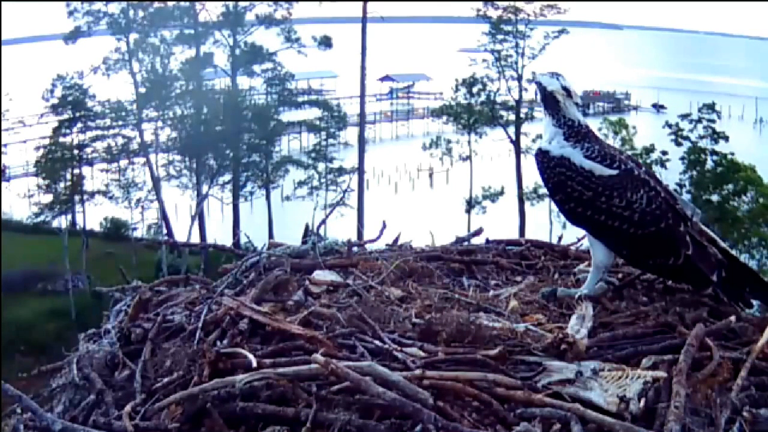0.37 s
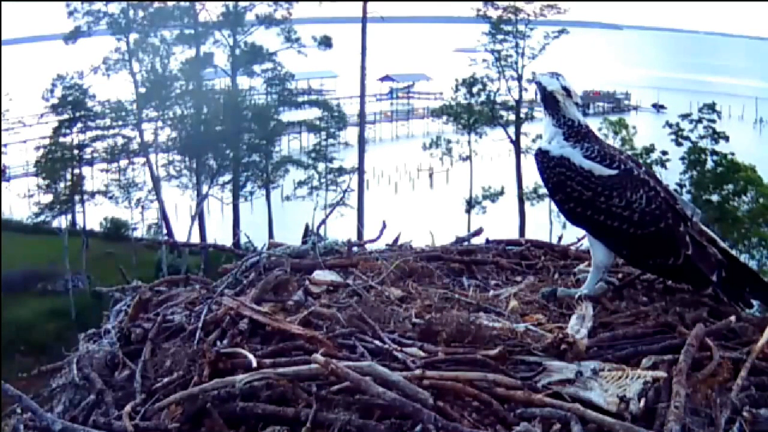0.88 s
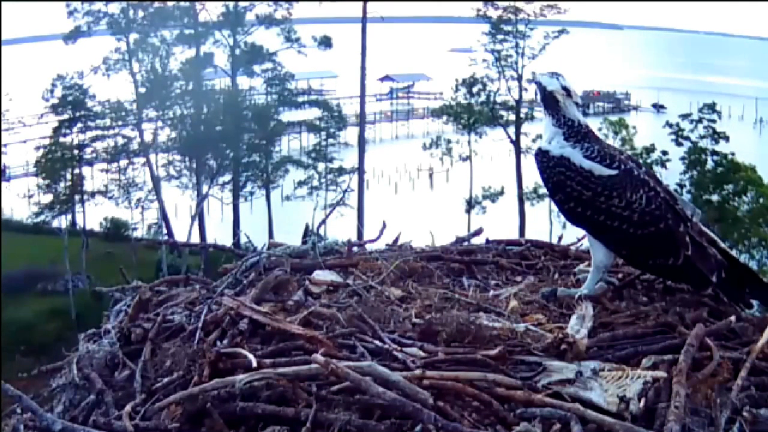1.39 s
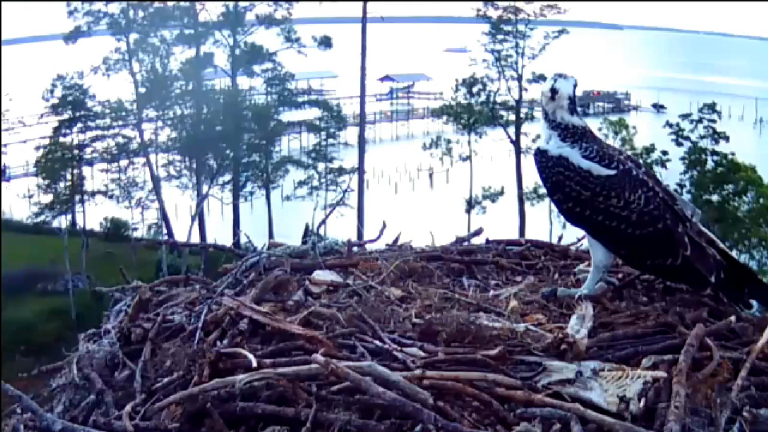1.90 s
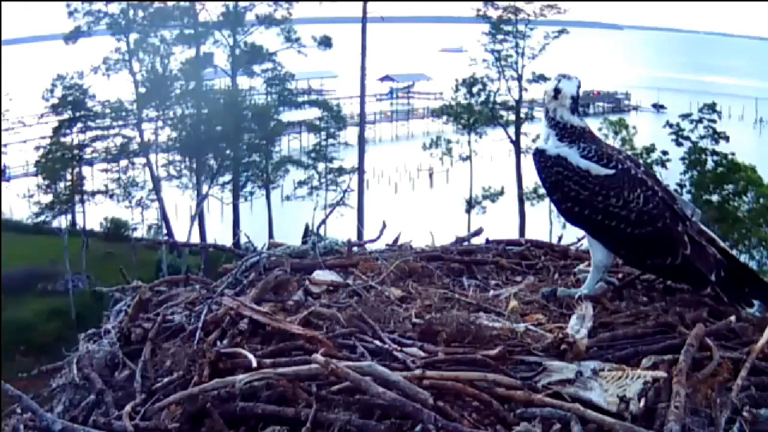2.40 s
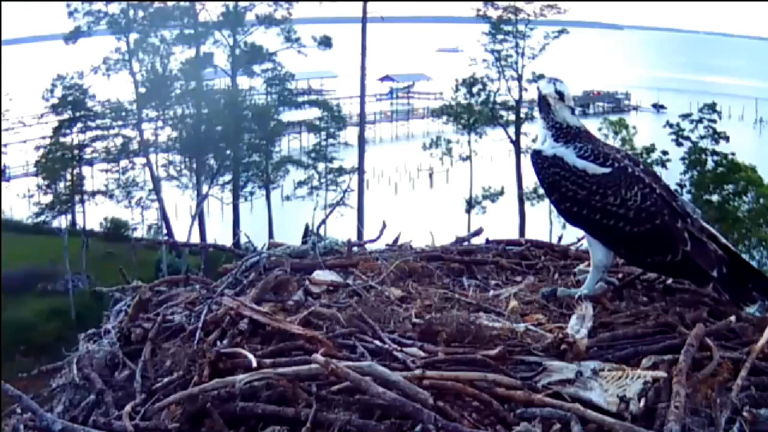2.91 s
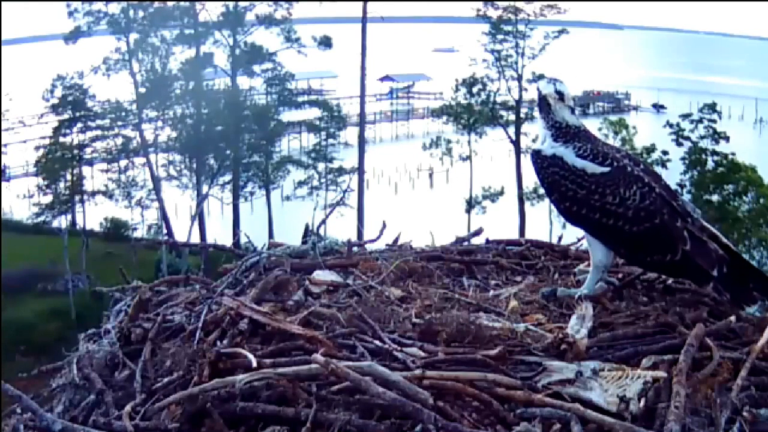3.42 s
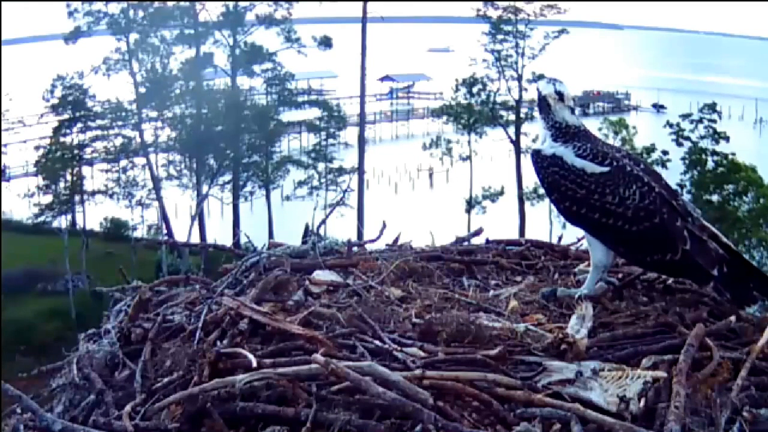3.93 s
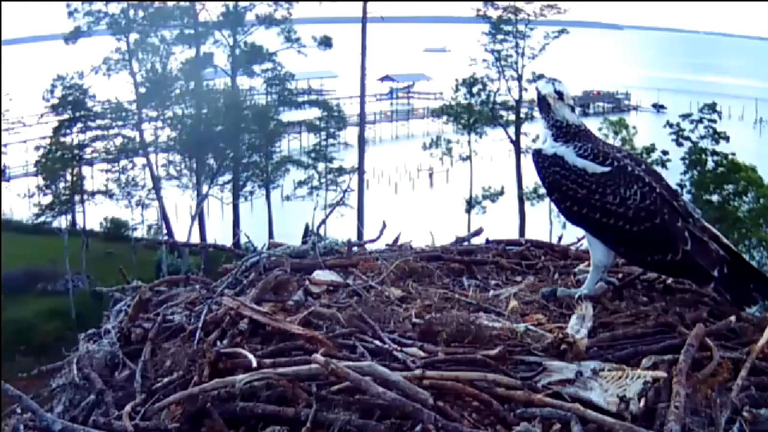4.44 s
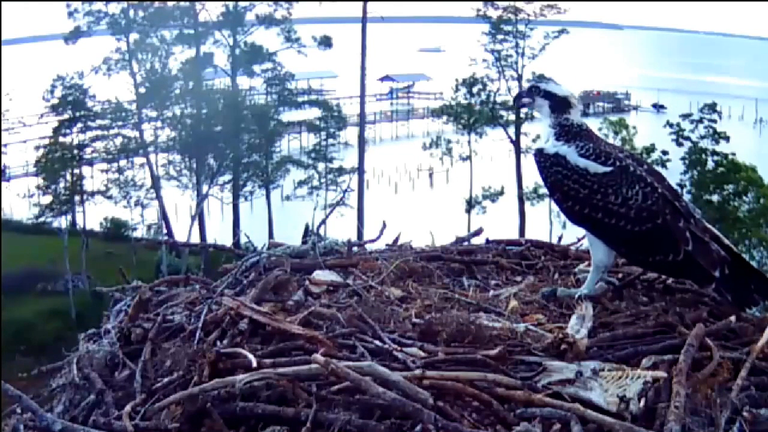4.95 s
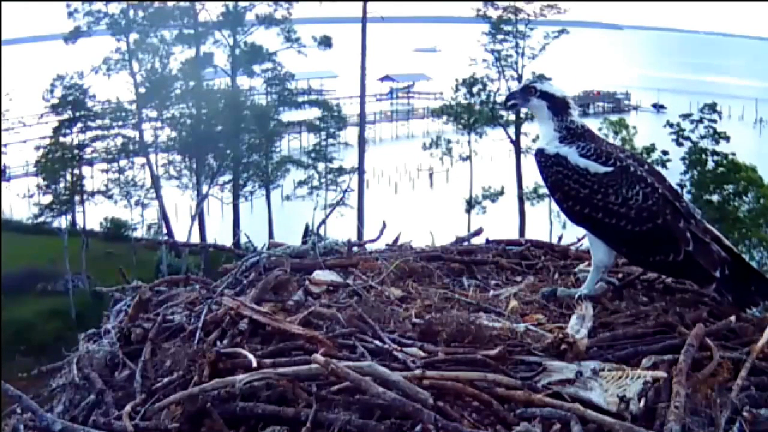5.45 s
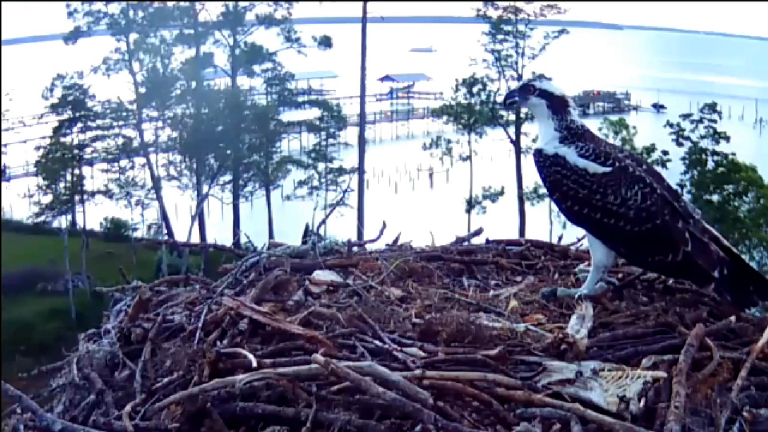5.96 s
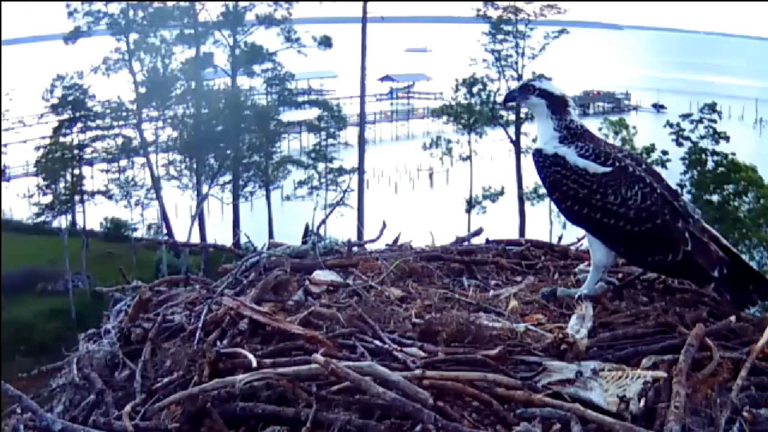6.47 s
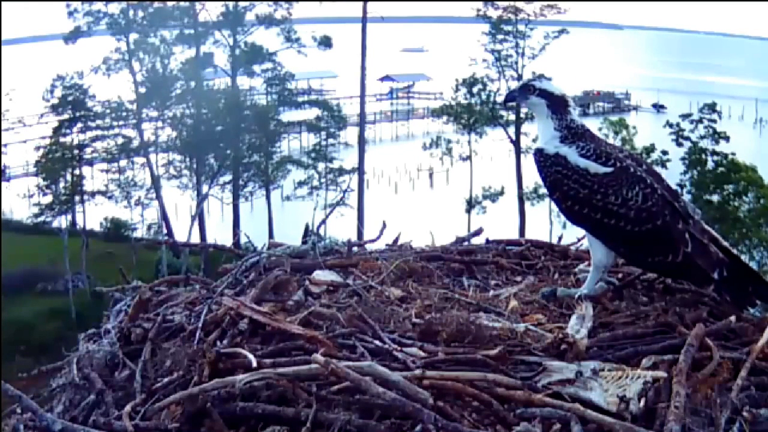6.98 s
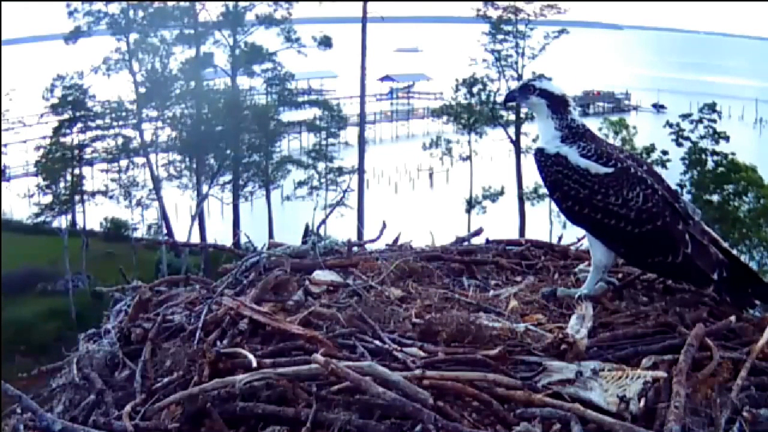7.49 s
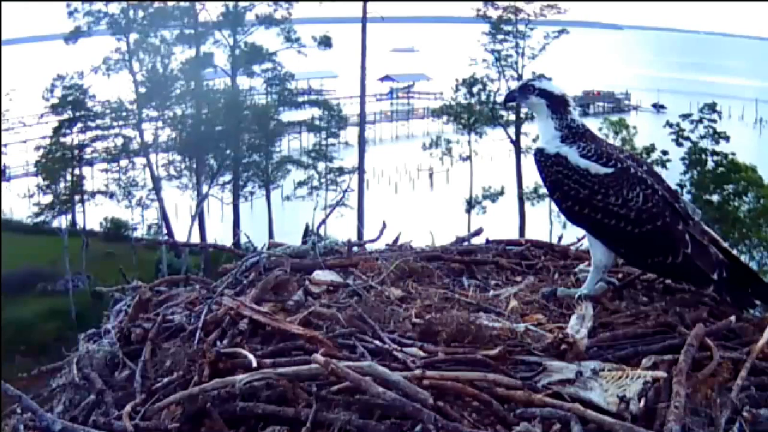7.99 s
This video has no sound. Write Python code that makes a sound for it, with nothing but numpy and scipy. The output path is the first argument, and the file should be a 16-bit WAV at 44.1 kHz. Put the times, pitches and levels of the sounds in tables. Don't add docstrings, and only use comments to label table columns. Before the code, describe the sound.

A young bird of prey fires off a rapid run of piercing upslurred whistles outdoors, over a faint low engine hum and airy hiss.

```python
import sys
import numpy as np
from scipy import signal
from scipy.fft import rfft, irfft, next_fast_len
from scipy.io import wavfile
from scipy.ndimage import uniform_filter1d, map_coordinates

SR = 44100
rng = np.random.default_rng(int(sys.argv[2]) if len(sys.argv) > 2 else 0)


def inscribe(sig):
    pcm = np.round(np.clip(np.atleast_2d(sig).T, -1, 1) * 32767)
    wavfile.write(sys.argv[1], SR, pcm.astype(np.int16))


def boost(x):
    u = np.asarray(x, float) / 20
    return 10 ** u


N = 361458
T = np.arange(N) / SR
CREST = 0.776

# freq_hz, density_db (per Hz)
HUM_COLOUR = [(30, -38), (118, -65), (140, -11.5), (180, -10.5), (240, -5), (290, -2.5), (350, -9.5),
              (420, -17.5), (530, -24), (800, -38), (1100, -58)]
# start_s, length_s, pitch_hz, level_db, end_change_db
BREAKS = [(1.307, 0.025, 2430, -22, -18), (1.494, 0.044, 2574, -12, -19), (1.646, 0.037, 2581, -11.5, -24),
          (1.796, 0.04, 2605, -12, -17), (1.95, 0.025, 2610, -15, -6), (2.71, 0.032, 2703, -13.5, -8),
          (2.869, 0.034, 2717, -12.5, -9.5), (3.021, 0.035, 2748, -13.5, -2.5),
          (3.181, 0.026, 2714, -15.5, 3), (3.325, 0.048, 2770, -15, -3.5), (3.483, 0.041, 2806, -15.5, 1),
          (3.641, 0.035, 2834, -17, 4), (3.794, 0.038, 2814, -15, 4.5), (3.964, 0.029, 2760, -14.5, 0.5),
          (4.12, 0.035, 2746, -13.5, -1)]
# time_s, opening_hz, climb_power (how it slows), second_partial_db
MOOD = [(1.474, 1743, 1.27, -2.5), (1.617, 1780, 1.23, -0.5), (1.764, 1803, 1.15, 1.5),
        (1.909, 1855, 1.2, 2), (2.055, 1853, 1.61, 0), (2.361, 1836, 1.79, -1.5), (2.513, 1863, 1.65, -1),
        (2.665, 1847, 1.4, -1.5), (2.822, 1886, 1.4, 0), (2.979, 1870, 1.15, -3), (3.135, 1858, 1.41, -5),
        (3.291, 1878, 1.33, -4), (3.445, 1895, 1.3, 1), (3.598, 1887, 1.6, 1.5), (3.755, 1906, 1.328, 3.5),
        (3.915, 1916, 1.6, -5.5), (4.081, 1867, 1.3, -2)]


def unit(x):
    return x / np.sqrt(np.mean(x ** 2) + 1e-20)


def along(points, hz):
    f, v = np.transpose(points)
    return np.interp(np.log(hz + 1), np.log(f + 1), v)


def track(table, column=1):
    columns = np.transpose(table)
    return np.interp(T, columns[0], columns[column])


def wobble(rate_hz):
    knots = rng.standard_normal(int(N * rate_hz / SR) + 4)
    return map_coordinates(knots, [T * rate_hz])


def filtered(x, points):
    m = next_fast_len(N + 8192)
    gain = boost(along(points, np.fft.rfftfreq(m, 1 / SR)))
    return irfft(rfft(x, m) * gain, m)[:N]


def noise(points):
    return unit(filtered(rng.standard_normal(N), points))


def spans(rows, size):
    inside = sum((T > a) & (T < b) for a, b in rows) * 1.
    return uniform_filter1d(inside, size=size)


def whistle(notes, overtone_db, flutter_db, edge_s):
    # freq_hz, gain_db
    edge_response = [(3400, -7.5), (3700, 5), (3900, -2.5), (4050, -28.5), (4300, -43.5), (5000, -48)]
    # freq_hz, gain_db
    edge_ringing = [(3850, -36), (3960, -10.5), (4080, -11.5), (4200, -20), (4350, -44), (4500, -59)]
    upper_attack_s = 0.0043
    ring_hz, ring_slide = 3930, .3
    mood = np.transpose(MOOD)
    out, flutter = np.zeros(N), wobble(170)
    for note in notes:
        s, hz, db = np.transpose(note)
        i = np.arange(round(s[0] * SR), min(round(s[-1] * SR), N))
        since = T[i] - s[0]
        pitch = uniform_filter1d(np.interp(T[i], s, hz), size=130)
        phase = 2 * np.pi * np.cumsum(pitch) / SR
        upper_db = overtone_db - 10 * np.clip(1 - since / upper_attack_s, 0, 1)
        upper_db = upper_db + np.interp(s[0], mood[0], mood[3])
        second = boost(upper_db + along(edge_response, 2 * pitch)) * np.sin(2 * phase)
        ring_phase = 2 * np.pi * (1 + ring_slide) * ring_hz * T[i] - 2 * ring_slide * phase
        ring = boost(upper_db + along(edge_ringing, 2 * pitch)) * np.sin(ring_phase)
        fade = np.clip(np.minimum(since, s[-1] - T[i]) / edge_s, 0, 1)
        level = boost(np.interp(T[i], s, db) + flutter_db * flutter[i])
        out[i] += np.sqrt(2) * level * fade * (np.sin(phase) + second + ring)
    return out


def engine_hum():
    # time_s, level_db
    hum_level = [(0, -47), (.1, -45), (.38, -48), (.66, -47), (.72, -47.5), (.9, -47), (1.4, -47),
                 (2.3, -45), (3, -47), (3.65, -47), (3.86, -44.5), (4.3, -47.5), (4.9, -47), (5.85, -47.5),
                 (6.08, -45), (6.3, -47.5), (7.55, -49.5), (8.2, -46.5)]
    # time_s, firing_hz, second_order_db
    engine_run = [(0, 156, -45), (.1, 152.2, -35.5), (.4, 151.7, -56), (.75, 151.1, -46),
                  (1.1, 151.5, -50.5), (1.6, 150.9, -49.5), (2.25, 150, -43.5), (2.62, 149.9, -51.5),
                  (2.88, 150, -41), (3.15, 149.1, -55), (3.4, 149.5, -47), (3.6, 148.8, -55),
                  (3.9, 147.7, -44.5), (4.6, 143.8, -45.5), (5.8, 143.4, -51), (6.1, 143.9, -42.5),
                  (6.9, 143.8, -60.5), (7.5, 143.9, -55), (8.2, 142.5, -44)]
    phase = 2 * np.pi * np.cumsum(track(engine_run) + 1.378 * wobble(7)) / SR
    tones = boost(-10.5 + 1.8 * wobble(6)) * np.sin(phase)
    tones = tones + boost(-11.5 + 4.8 * wobble(4.004)) * np.sin(1.6 * phase + 1.63 * wobble(14))
    rumble = boost(-1.5 + 0.33 * wobble(7.6)) * noise(HUM_COLOUR)
    gust_db = 1.7 * wobble(6.4)
    hum = boost(track(hum_level) + gust_db) * (rumble + tones)
    second_order = boost(track(engine_run, 2) - 3.0 + 1.53 * wobble(9)) * np.sin(2 * phase)
    return hum + np.sqrt(2) * second_order


def leaves_and_water():
    # freq_hz, density_db (per Hz)
    air_colour = [(500, -29.5), (800, -24), (1040, -7), (1520, -10.5), (2100, -3.5), (3200, -6),
                  (3900, -3.5), (4100, -28.5), (5600, -44)]
    return boost(-54.0 + 0.98 * wobble(2.77) + 0.23 * wobble(19.0)) * noise(air_colour)


def insects():
    # time_s, level_db
    chorus_level = [
        (0, -84),
        (1.2, -58.5),
        (4.3, -55),
        (6, -56.5),
        (8.2, -55),
    ]
    band = noise([(3200, -27.0), (3450, 3.0), (3750, 3.5), (3950, -5.5), (4100, -26),
                  (10800, -28), (11100, -61)])
    return boost(track(chorus_level) + 1.1 * wobble(5.5)) * band


def far(rows, bend):
    u = np.linspace(0, 1, num=12)
    notes = []
    for s, length, hz, db, crest in rows:
        pitch = hz - bend * ((u - crest) * length) ** 2
        level = db - 3.5 * (2 * u - 1) ** 2
        notes.append(np.transpose([s + u * length, pitch, level]))
    return notes


def far_birds():
    # start_s, length_s, crest_hz, level_db, crest_share (of
    steep_calls = [(.215, .085, 2610, -57, .55), (.655, .075, 2630, -56, .5), (.85, 0.09, 2700, -55.5, .55),
                   (1.062, 0.06, 2770, -54.5, 0.7), (4.248, 0.008, 1840, -30, .5),
                   (2.44, .07, 2820, -51, .65), (4.62, .03, 2060, -55, 1.5),
                   (4.772, 0.075, 2930, -45.5, 0.5), (4.975, .088, 3010, -45, .55),
                   (5.03, .04, 2220, -56, -.2), (5.165, .05, 2190, -52, .95), (5.2, 0.066, 3010, -44, 0.55),
                   (5.215, .075, 2270, -55, .4), (5.395, 0.075, 2180, -49, 0.8),
                   (5.452, .045, 3020, -43, -.3), (5.47, .055, 2200, -54, -.3)]
    # start_s, length_s, crest_hz, level_db, crest_share
    flat_calls = [(.022, 0.058, 3110, -56, .5), (.05, .05, 2600, -60, -.5), (.47, 0.06, 2720, -55, 0.8),
                  (.72, 0.085, 2490, -55, 0.4), (1.345, .048, 2720, -52, 0.72),
                  (1.868, 0.028, 2770, -47, .5), (2.27, 0.038, 2750, -48, .2), (3.28, .045, 2750, -44, .9),
                  (3.075, 0.073, 2780, -52, .7), (3.72, .045, 2810, -51, .6),
                  (7.33, 0.065, 1900, -56.5, .6), (7.555, 0.035, 2060, -55, .2),
                  (7.76, 0.075, 2150, -57.5, .8), (7.82, .06, 2240, -61, .4), (8.01, 0.035, 2080, -55, 0.4)]
    return whistle(far(steep_calls, 125000) + far(flat_calls, 28600), -60, 3.6, .012)


def breaks():
    sag_shapes = [(0.13, 0.09), (0.23, 0.084), (0.14, 0.12), (0.055, 0.11), (.15, 0.16), (0.16, 0.087),
                  (.05, 0.11), (.05, 0.11), (0.075, 0.091), (.33, 0.12), (0.12, 0.1), (0.058, 0.12),
                  (0.043, 0.09), (.03, 0.1), (0.12, 0.09)]
    sag_bend, release_s, release_db = 2.22, 0.0069, -28
    u = np.linspace(0, 1, num=24)
    notes = []
    for (s, length, hz, db, tire_db), (crest, sag) in zip(BREAKS, sag_shapes):
        pitch = hz * (1 - sag * np.abs((u - crest) / (1 - crest)) ** sag_bend)
        release = release_db * np.clip(1 - (1 - u) * length / release_s, 0, 1)
        notes.append(np.transpose([s + u * length, pitch, db + tire_db * u ** 2 + release]))
    return notes


def climbs(rows, lengths, crest):
    attack_s, attack_db = .008, -15
    half_swell = 0.083
    turn_hz, turn_db = 120, -6
    mood = np.transpose(MOOD)
    u = np.linspace(0, 1, num=24)
    notes = []
    for (s, top_hz, early_db, top_db, swell), length in zip(rows, lengths):
        past = np.clip(u - crest, 0, 1) / (1 - CREST)
        from_hz = np.interp(s, mood[0], mood[1])
        bend = np.interp(s, mood[0], mood[2])
        risen = 1 - np.clip(1 - u / crest, 0, 1) ** bend
        pitch = from_hz + (top_hz - from_hz) * risen - turn_hz * past ** 2
        level = np.interp(u, [swell - half_swell, swell + half_swell], [early_db, top_db])
        level = level + turn_db * past + attack_db * np.clip(1 - u * length / attack_s, 0, 1)
        notes.append(np.transpose([s + u * length, pitch, level]))
    return notes


def catches():
    # time_s, width_s, depth_db
    beat_notches = [(1.4828, 0.0019, -8), (1.9349, 0.0033, -5), (1.9425, 0.0011, -8), (1.9476, 0.0025, -7),
                    (1.782, .012, 4), (2.1206, 0.0015, -7), (2.217, .004, 3), (2.1274, 0.00089, 0),
                    (2.2275, 0.0027, -1.5), (2.234, 0.0017, -15), (2.2412, 0.0016, -10),
                    (2.2675, 0.0034, -7), (2.2745, 0.0016, -5), (2.28, 0.0028, -1), (2.3695, 0.0025, -6.1),
                    (2.42, .004, -2.5), (2.4265, 0.0025, -6), (2.4322, 0.0019, -5), (2.5281, 0.0023, -6),
                    (2.5347, 0.003, -14), (2.547, 0.0073, -5.5), (2.572, 0.003, -2), (2.578, 0.004, 4),
                    (2.5859, 0.003, 2), (2.6718, 0.0023, -9), (2.6952, 0.006, -6.5), (2.8283, 0.0014, 0),
                    (2.8328, 0.0017, -14), (2.8426, 0.0029, -21), (2.986, .004, 3), (2.9946, 0.007, -6),
                    (3.0125, 0.0026, -5), (3.297, .003, 3), (3.3003, 0.0016, -5), (3.3039, 0.0022, -11),
                    (3.4435, .003, -9), (3.4553, 0.0026, -7), (3.462, 0.0029, -6), (3.6035, 0.0013, -2),
                    (3.6096, 0.0018, -11), (3.606, .003, 4), (3.614, 0.0028, -8), (3.7657, 0.0029, -8),
                    (3.7711, 0.0022, -8), (3.7821, 0.004, -5), (3.79, .005, 4), (3.905, .004, -8),
                    (3.9267, 0.0029, -9), (3.936, 0.0036, -11), (4.078, .003, -10), (4.094, 0.0021, -9),
                    (4.1055, 0.0037, -7)]
    return boost(sum(0.84 * db * np.exp(-(1.44 * (T - s) / width) ** 2) for s, width, db in beat_notches))


def fading(rows):
    return [[(s, hz, db), (s + length, hz - 60.4, db - 13.5)] for s, length, hz, db in rows]


def sibling():
    # start_s, length_s, end_hz, level_db
    lead_notes = [(1.884, 0.05, 2240, -32), (2.184, 0.095, 2170, -27.5), (2.319, 0.052, 2300, -32.5),
                  (2.485, 0.045, 2160, -34.5), (2.646, 0.052, 2160, -22), (2.784, 0.066, 2310, -31.5),
                  (2.947, 0.059, 2020, -33), (3.084, 0.053, 2060, -44), (3.258, 0.068, 2255, -30.5),
                  (3.418, 0.076, 2234, -25), (3.547, 0.12, 2210, -36), (3.715, 0.055, 2230, -37),
                  (3.884, 0.033, 2140, -33), (4.057, 0.036, 1990, -31)]
    # start_s, length_s, pitch_hz, level_db
    tail_notes = [(1.96, 0.052, 2190, -41), (2.117, 0.042, 2186, -25), (2.271, 0.052, 2160, -30),
                  (2.418, 0.066, 2102, -34), (2.595, 0.08, 2090, -37.5), (2.73, 0.032, 2203, -61),
                  (3.196, 0.062, 1900, -47), (3.386, 0.046, 1996, -44), (3.674, 0.043, 2030, -37),
                  (3.828, 0.057, 2170, -44), (3.058, 0.026, 2050, -41), (3.53, 0.04, 2100, -43.5),
                  (4.19, 0.07, 2000, -51), (3.997, 0.039, 2050, -42), (4.148, 0.034, 2050, -28)]
    lead_hz = 2050
    leads = []
    for s, length, hz, db in lead_notes:
        leads.append([(s, lead_hz, db - 14), (s + length / 2, lead_hz, db - 2), (s + length, hz, db + 5)])
    return whistle(leads + fading(tail_notes), -60, 2.6, .007)


def chips():
    # start_s, length_s, first_hz, last_hz, level_db
    slides = [(1.929, .028, 2350, 2660, -24), (2.044, .01, 2300, 1800, -41), (2.225, .02, 2250, 2260, -31),
              (2.952, .014, 2050, 2050, -37), (2.505, .01, 1800, 1810, -39), (2.59, .018, 2050, 2250, -27),
              (2.654, .013, 2150, 2000, -31), (2.735, .04, 2200, 2180, -48), (2.35, .014, 2200, 2050, -28),
              (2.812, .012, 2100, 1900, -33), (4.572, .008, 2700, 2300, -50),
              (4.652, .008, 2700, 2200, -52), (3.122, .012, 2250, 1950, -32),
              (3.203, .016, 1880, 1860, -33), (3.592, .008, 2100, 1950, -31),
              (3.746, .008, 2100, 1900, -33), (3.906, .008, 2100, 2000, -33)]
    notes = [[(s, a, db - 4), (s + length, b, db)] for s, length, a, b, db in slides]
    return whistle(notes, -60, 3, .003)


def flicks(notes, length, from_hz, to_hz, db):
    falls = []
    for note in notes:
        s = note[-1, 0] - .006
        middle = (s + length / 2, (2 * from_hz + to_hz) / 3, db)
        falls.append([(s, from_hz, db), middle, (s + length, to_hz, db - 6)])
    return falls


def echoed(voice):
    # delay_s, level_db
    reflections = [
        (.009, -23),
        (.03, -41),
    ]
    t = T[:SR // 2]
    scatter = rng.standard_normal(len(t)) * boost(-60 * t / .5)
    answer = boost(-31) * scatter / np.linalg.norm(scatter)
    for s, echo_db in reflections:
        answer[round(s * SR)] += boost(echo_db)
    return voice + signal.fftconvolve(voice, answer)[:N]


def chick():
    # start_s, top_hz, early_db, top_db, swell_share (of length)
    climbing = [(1.474, 2057, -20.5, -19, 0.97), (1.617, 2184, -22, -17.5, 0.53),
                (1.764, 2212, -22.5, -14, 0.7), (1.909, 2235, -19.5, -21.5, 0.21),
                (2.668, 2285, -21.5, -14, 0.61), (2.822, 2287, -22.5, -14.5, 0.52),
                (2.979, 2295, -21.5, -10.5, 0.75), (3.135, 2290, -22.5, -16.5, 0.45),
                (3.291, 2265, -20.5, -13.5, 0.62), (3.445, 2330, -21.5, -13.5, 0.57),
                (3.6, 2322, -21, -14.5, 0.52), (3.755, 2340, -22.5, -14, 0.59),
                (3.915, 2310, -20.5, -14.5, 0.53), (4.081, 2317, -20.5, -14.5, 0.51)]
    # start_s, top_hz, early_db, top_db, swell_share
    arching = [
        (2.055, 2215, -20.5, -15.5, 0.38),
        (2.209, 2240, -22, -16.5, 0.71),
        (2.361, 2218, -21, -14, 0.44),
        (2.515, 2216, -21.5, -16, 0.4),
    ]
    # start_s, length_s, pitch_hz, level_db
    lingering = [
        (1.95, 0.026, 2190, -32),
        (2.712, 0.034, 2290, -26),
        (3.183, 0.018, 2220, -20),
        (3.329, 0.014, 2340, -16.5),
        (3.485, 0.019, 2320, -26),
        (4.122, 0.027, 2330, -29),
    ]
    # length_s, start_hz, end_hz, level_db
    drops = [
        (0.0191, 2170, 1780, -25),
        (0.0115, 2030, 1760, -34),
    ]
    arch_s, overlap_s = .063, 0.0051
    high = breaks()
    arches = climbs(arching, [arch_s] * len(arching), CREST)
    lengths = [after[0] + overlap_s - row[0] for row, after in zip(climbing, BREAKS[1:])]
    low = climbs(climbing, lengths, 0.94)
    singing = spans([(n[0, 0] + .004, n[-1, 0]) for n in low + arches], size=200)
    voice = whistle(low + arches + fading(lingering), 0, .45, .003)
    voice = voice + boost(-1.5 * singing) * sibling()
    voice = catches() * (voice + whistle(flicks(arches, *drops[0]), 0, 1, .003))
    voice = voice + whistle(high, -9, .5, .003) + chips()
    voice = voice + whistle(flicks(high[6:], *drops[1]), -3, 1.5, .003)
    delay_s, width_s, dip_db = .003, .0016, -6
    dips = sum(dip_db * np.exp(-((T - row[0] - delay_s) / width_s) ** 2) for row in BREAKS[1:])
    return echoed(voice * boost(dips))


def scene():
    return (engine_hum() + leaves_and_water() + insects() + far_birds() + chick())[None]


def circuit_hiss(busy, idle):
    # freq_hz, density_db (per Hz)
    hiss_colour = [(290, -66), (500, -23.5), (1050, -20), (2480, -9), (3430, -8), (4510, -6), (5340, -6.5),
                   (7880, -6.5), (9830, -13.5), (10800, -10), (11150, -36), (11350, -75), (22000, -120)]
    # from_s, to_s
    lost_treble = [
        (1.33, 1.348),
        (1.44, 1.475),
        (1.608, 1.619),
        (1.735, 1.765),
        (2.035, 2.056),
    ]
    hz, t, z = signal.stft(boost(-52.0) * noise(hiss_colour), SR, nperseg=2048)
    chance = np.repeat(rng.random((len(hz), len(t) // 2 + 1)), 2, axis=1)[:, :len(t)]
    edge_hz = 7900 + 380 * np.interp(t, T, wobble(6.0)) + 1500 * np.interp(t, T, idle)
    share = np.interp(hz[:, None] - edge_hz, [-1200, 0, 100, 1000, 2400], [1, .5, .055, .035, .002])
    line = boost(14.5) * z / np.abs(z + 1e-12) * np.mean(np.abs(z), axis=1, keepdims=True)
    kept = np.where(share < .07, line, z)
    thinned = np.where(chance < share, kept, boost(-13) * z)
    mixed = np.where(np.interp(t, T, busy) > .5, z, thinned)
    hiss = signal.istft(mixed, SR, nperseg=2048)[1][:N]
    return hiss - .7 * spans(lost_treble, size=90) * filtered(hiss, [(4000, -60), (5000, 0)])


def limited(x):
    envelope = np.abs(signal.hilbert(x, next_fast_len(N))[:N])
    return x / (1 + (envelope / .31) ** 7) ** (1 / 7)


def clock_flutter(x):
    # freq_hz, level_db
    mirrors = [(3900, -20.5), (7800, -27), (11700, -28.5), (10350, -30), (6450, -32), (2550, -35),
               (1350, -37.5), (5250, -38)]
    return x * (1 + sum(boost(db) * np.cos(2 * np.pi * hz * T) for hz, db in mirrors))


def band_limit(x):
    return signal.sosfilt(signal.butter(12, 11540, fs=SR, output="sos"), x)


def record(dry):
    # from_s, to_s
    gate_shut = [
        (.419, .474),
        (1.122, 1.3098),
        (1.394, 1.456),
        (4.256, 4.571),
        (4.661, 4.777),
        (6.228, 6.539),
        (6.627, 6.688),
        (6.77, 6.828),
    ]
    # centre_s, length_s, level_db
    noise_bursts = [(1.523, 0.036, -30.5), (1.662, 0.036, -36), (1.825, 0.034, -36), (1.957, 0.033, -28),
                    (2.124, 0.02, -38.5), (2.258, 0.041, -38), (2.429, 0.014, -35), (2.55, 0.036, -44),
                    (2.6, 0.015, -36), (2.725, 0.027, -28.5), (2.891, 0.031, -31.5), (3.02, 0.018, -38),
                    (3.072, 0.013, -36.5), (3.192, 0.031, -27), (3.359, 0.033, -30), (3.494, .03, -41),
                    (3.539, 0.015, -38), (3.61, 0.04, -41), (3.663, 0.032, -32.5), (3.798, .01, -38),
                    (3.834, 0.024, -34), (3.972, .015, -39), (4.008, 0.016, -35), (4.107, .03, -44),
                    (4.141, 0.027, -32.5), (4.185, 0.0071, -41)]
    # freq_hz, density_db
    grit_colour = [(60, -3.5), (500, -14), (1500, -6.5), (2700, 4), (3500, 6), (4800, -2.5), (8000, -1.5),
                   (10500, 0.5), (11300, -28.5)]
    shut = spans(gate_shut, size=60)
    gated = dry[0] * boost(-30 * shut) + boost(-68) * shut * noise(HUM_COLOUR)
    x = limited(filtered(gated, [(70, -25), (115, -8), (140, 0)]))
    level = np.sqrt(np.abs(uniform_filter1d(x ** 2, size=500)))
    spray = sum(boost(db) * np.exp(-(2 * (T - s) / length) ** 4) for s, length, db in noise_bursts)
    fray = noise([(50, 0), (400, -3), (800, -14), (1300, -22), (2000, -34)])
    x = x * (1 + (boost(-26) * (level > .016) + boost(11) * spray) * fray)
    x = clock_flutter(x)
    thump = filtered(x ** 2, [(15, -31.0), (30, -10.5), (100, 5.5), (300, -7), (600, -89.0)])
    grit = boost(1.8 * wobble(140)) * (boost(-30.5) * level + boost(-3) * spray) * noise(grit_colour)
    clock_leak = boost(-38) * level * noise([(3650, -40), (3780, -4), (3860, 0), (3950, -40)])
    busy = uniform_filter1d(level, size=2500) > .012
    idle = uniform_filter1d(shut, size=6000) ** 2
    rumble = boost(-74.0) * noise([(20, -14.5), (120, -11.0), (500, -12.0), (900, -63), (2000, -120)])
    x = x + 0.093 * thump + grit + clock_leak + circuit_hiss(busy, idle) + rumble
    x = filtered(x, [(9000, 0.0), (10600, -2.5), (11150, -12), (11330, -30), (11600, -58)])
    return band_limit(x[None])


dry = scene()
out = record(dry)
inscribe(out)
```